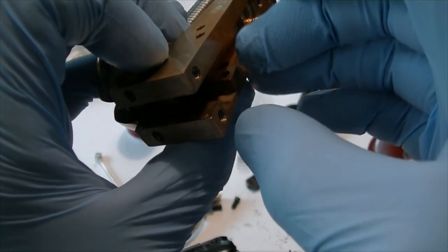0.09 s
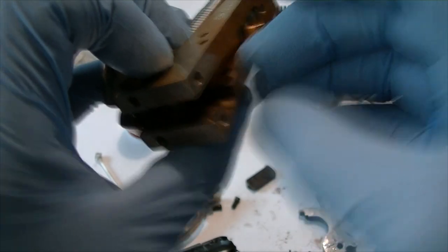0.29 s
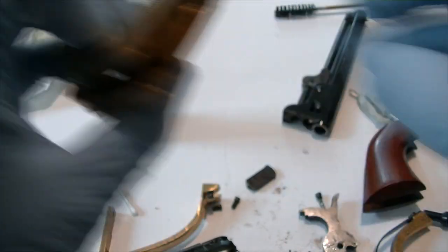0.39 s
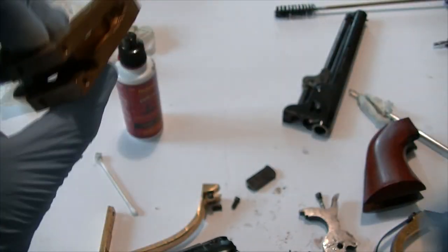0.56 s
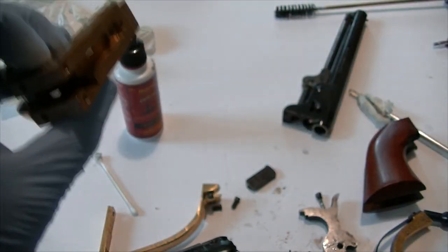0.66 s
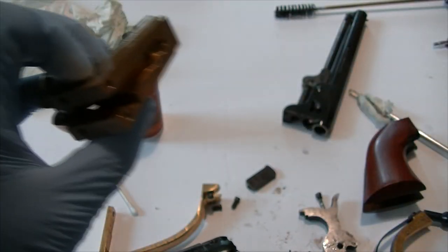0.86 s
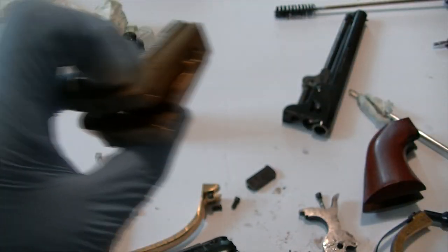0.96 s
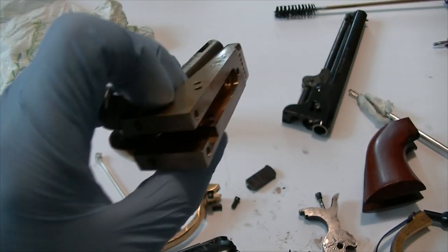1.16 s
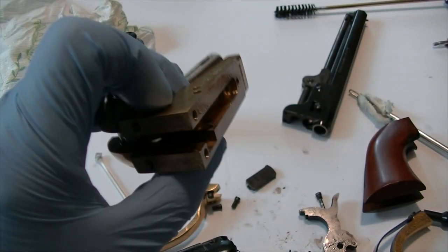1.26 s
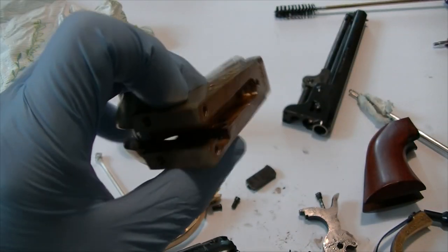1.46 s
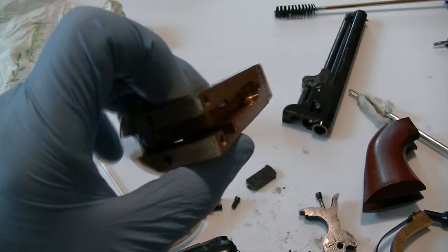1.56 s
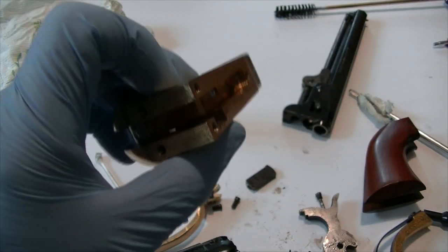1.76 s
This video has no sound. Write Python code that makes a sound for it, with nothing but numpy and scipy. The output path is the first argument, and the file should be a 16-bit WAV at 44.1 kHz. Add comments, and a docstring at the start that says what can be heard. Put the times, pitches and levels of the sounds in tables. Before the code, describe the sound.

A hand tool knocks on a table, bounces and skids to rest after a faint metal ping; then a soft hand bump, rubber glove strokes on metal and light ticks, close up in a small humming room.

```python
"""A motor hums in a small room while gloved hands work on a brass gun frame, close to the microphone.
First a steel part pings (decaying sines) and the rubber squeaks thinly (narrow noise). A hand tool then
knocks, bounces and skids to rest on the table (coloured bursts, table modes, tiny slips), and a hand bumps it.
Last the glove strokes the frame (dense random slips) and squeaks again. Loose parts tick throughout."""
import sys
import numpy as np
from scipy import signal
from scipy.fft import rfft, irfft
from scipy.io import wavfile
from scipy.ndimage import uniform_filter1d

SR = 44100
rng = np.random.default_rng(int(sys.argv[2]) if len(sys.argv) > 2 else 0)


def to_wav(sig):
    """Store sig (one row per channel, or 1-D mono) as 16-bit WAV at the path in sys.argv[1].

    Samples outside -1..1 are clipped; the rate is SR.
    """
    pcm = np.clip(np.atleast_2d(sig), -1, 1) * 32767
    pcm = np.round(pcm).astype(np.int16)
    wavfile.write(sys.argv[1], SR, pcm.T)  # frames by channels


N = 79380
T = np.arange(N) / SR
FREQ_HZ = np.arange(N + 1) * SR / (2 * N)
MID_SIDE_SIGNS = np.array([[1], [-1]])


def undb(db):
    """Decibels to gain."""
    return 10 ** (np.asarray(db) / 20)


def curve(points, size=N):
    """Join (Hz, value) points on a log-frequency axis."""
    hz, value = np.array(points, float).T
    grid_hz = np.linspace(1, SR / 2, size + 1)
    return np.interp(np.log(grid_hz), np.log(hz), value)


def shape(x, response):
    """Apply a frequency response, zero-padded to twice the length."""
    size = x.shape[-1]
    return irfft(rfft(x, 2 * size) * response)[..., :size]


def colour(x, db):
    """Minimum-phase filter with the given gain: the cepstrum is folded to positive time."""
    size = x.shape[-1]
    cepstrum = irfft(db * np.log(10) / 20)
    cepstrum[..., 1:size] *= 2
    cepstrum[..., size + 1:] = 0
    return shape(x, np.exp(rfft(cepstrum)))


def even(x, size):
    """Level the spectrum of a burst, smoothed over size bins; its spread in time stays."""
    power = np.abs(rfft(x, 2 * x.shape[-1])) ** 2
    return colour(x, -10 * np.log10(uniform_filter1d(power, size, axis=-1)))


def unit(x):
    """Scale to rms 1."""
    return x / np.sqrt(np.mean(x ** 2))


def fade(t60_s):
    """Exponential decay from time zero, 60 dB in t60_s."""
    return np.exp(-np.log(1000) * np.minimum(T / t60_s, 10))


def delay(x, start_s):
    """Start a sound at the given time."""
    return np.pad(x, ((0, 0), (max(int(start_s * SR), 0), N)))[:, :N]


def ring(modes):
    """Decaying sines of a struck object."""
    return sum(undb(level_db) * fade(t60_s) * np.sin(2 * np.pi * pitch_hz * T)
               for pitch_hz, level_db, t60_s in modes)


def stereo_noise(side_db, size=N):
    """White noise in two channels with the given side-to-mid level."""
    mid, side = rng.standard_normal((2, size))
    gain = undb(curve(side_db, size))
    norm = np.sqrt(1 + gain ** 2)
    return shape(mid, 1 / norm) + MID_SIDE_SIGNS * shape(side, gain / norm)


# steady motor hum: pitch_hz, level_db (rms)
HUM_TONES = [(118.4, -66.5), (215.3, -58), (344.5, -56), (382.2, -65), (436.0, -61)]
# air noise spectrum: freq_hz, density_db (relative, per Hz)
AIR_SPECTRUM = [(25, -31), (55, -13.5), (326, -2), (394, -7.5), (775, -16), (1040, -18.5), (2110, -21),
                (3250, -23), (16000, -37)]
# air noise width: freq_hz, side_to_mid_db
AIR_SIDE = [(40, -7), (120, -2), (300, -12), (700, 0.5), (1500, 0), (8000, -3)]
AIR_RMS_DB = -50.5


def background():
    """A motor hums as steady sines of random phase over soft, spectrally shaped air noise."""
    hum = sum(np.sqrt(2) * undb(rms_db) * np.sin(2 * np.pi * (pitch_hz * T + rng.random()))
              for pitch_hz, rms_db in HUM_TONES)
    air = shape(stereo_noise(AIR_SIDE), undb(curve(AIR_SPECTRUM)))
    return hum + undb(AIR_RMS_DB) * unit(air)


# width of near sounds and of the echo: freq_hz, side_to_mid_db
NEAR_SIDE = [(500, -16), (1800, -16), (3400, -15), (7000, -0.5), (14000, 1.5)]
# reverberation: freq_hz, t60_s
ROOM_DECAY = [(200, .5), (900, 0.67), (3000, 0.53), (8000, 0.41), (16000, 0.5)]
# echo strength: freq_hz, gain_db
ROOM_GAIN = [(100, -8), (300, -2), (900, -11.5), (2000, -13), (3400, -11), (5000, -10.5), (8000, -7.5),
             (16000, -10.5)]
ROOM_BUILD_S = 0.0054


def room(x):
    """Diffuse echo of a small room: noise bands, each with its own decay, convolved with the mono sum."""
    noise, tail = stereo_noise(NEAR_SIDE), 0
    centres_hz, t60s_s = np.array(ROOM_DECAY).T
    for t60_s, share in zip(t60s_s, np.eye(len(t60s_s))):
        band = curve(list(zip(centres_hz, share)))
        tail = tail + shape(noise, band) * fade(t60_s)
    build = 1 - np.exp(-(T / ROOM_BUILD_S) ** 2)
    tail = colour(even(tail * build, size=300), curve(ROOM_GAIN))
    return shape(x.mean(axis=0), rfft(tail, 2 * N))


# thud modes: pitch_hz, level_before_onset_db, t60_s
THUD_MODES = [(165, -31.5, 0.064)]
BUMP_START_S, BUMP_ONSET_T60_S = .7195, 0.04


def bump():
    """The side of the hand thuds on the table: a low, damped mode with a soft onset."""
    thud = ring(THUD_MODES) * (1 - fade(BUMP_ONSET_T60_S))
    return delay(thud[None], BUMP_START_S)


# free steel part: pitch_hz, level_before_onset_db, t60_s
STEEL_MODES = [(3090, -52, 0.099), (4367, -40, 0.11), (7030, -50, .04), (9640, -40.5, .025),
               (10600, -45, .025)]
PING_START_S, PING_ONSET_T60_S = .015, 0.0016


def ping():
    """A small free steel part rings in a few high modes."""
    steel = ring(STEEL_MODES) * (1 - fade(PING_ONSET_T60_S))
    return delay(steel[None], PING_START_S)


HIT_SAMPLES, SCATTER_FROM_HZ = 4096, 770


def contact(scatter, t60_s):
    """A sharp push plus dense, damped upper-range ringing; scatter is their amplitude ratio before levelling."""
    burst = stereo_noise(NEAR_SIDE, HIT_SAMPLES) * fade(t60_s)[:HIT_SAMPLES]
    highpass = signal.butter(2, SCATTER_FROM_HZ, "high", fs=SR, output="sos")
    burst = signal.sosfilt(highpass, burst)
    burst *= scatter / np.sqrt(np.sum(burst ** 2) / 2)
    burst[:, 0] += 1  # the push
    return even(burst, size=60)


# light touches of loose parts: start_s, level_db (before the tick spectrum)
TICK_EVENTS = [(0.158, -22), (.851, -21.5), (1.109, -19.5), (1.1897, -4), (1.578, -14), (1.6259, -17.5),
               (1.7275, -6.5)]
# tick spectrum: freq_hz, gain_db
TICK_SPECTRUM = [(100, -9), (500, -16), (1000, -2.5), (3500, 2), (6000, -7.5), (10000, -8), (16000, -28)]
TICK_SCATTER, TICK_T60_S = 1.35, 0.016


def ticks():
    """Loose parts touch inside the held frame as short coloured contacts."""
    taps = sum(undb(level_db) * delay(contact(TICK_SCATTER, TICK_T60_S), start_s)
               for start_s, level_db in TICK_EVENTS)
    return colour(taps, curve(TICK_SPECTRUM))


FLUTTER_PER_S, FLUTTER_STD_DB = 160, 2


def friction(strokes, spectrum, slips_per_s):
    """Tiny slips of random size; pressure rises and decays per stroke while the grip flutters."""
    slips = (rng.random(N) < slips_per_s / SR) * rng.standard_normal((2, N))
    side = shape(slips[1], undb(curve(NEAR_SIDE)))
    rub = unit(colour(slips[0] + MID_SIDE_SIGNS * side, curve(spectrum)))
    pressure = 0
    for start_s, length_s, attack_s, release_s, level_db in strokes:
        rise = np.clip((T - start_s) / attack_s, 0, 1)
        release = np.exp(-np.maximum(T - start_s - length_s, 0) / release_s)
        pressure = pressure + undb(level_db) * rise * release
    flutter = np.interp(T * FLUTTER_PER_S, np.arange(N), rng.standard_normal(N))
    return rub * pressure * undb(FLUTTER_STD_DB * flutter)


# tool scrapes: start_s, length_s, attack_s, release_s (time constant), level_db (full pressure, no flutter)
SKID_STROKES = [(.565, 0.091, 0.0079, 0.027, -41), (.77, 0.1, 0.011, 0.2, -57)]
# scrape spectrum: freq_hz, relative_db
SKID_SPECTRUM = [(100, -9), (230, 9), (550, 3.5), (850, 7), (1600, -2.5), (3400, -7), (6000, -8),
                 (16000, -32)]
SKID_SLIPS_PER_S = 1700


def skids():
    """The tool scrapes along the table as it settles, in sparse slips."""
    return friction(SKID_STROKES, SKID_SPECTRUM, SKID_SLIPS_PER_S)


# table top per unit blow: pitch_hz, level_db, t60_s
TABLE_RING = [(229.7, -68, 0.8), (254.4, -44, 0.22), (389.2, -62, 0.93), (447, -53.5, 0.57),
              (664, -50, 0.14), (824.6, -49, 0.15), (1011, -54.5, 0.083)]


def table_top(blows):
    """The table top rings on after each blow, in its own modes."""
    return shape(blows, rfft(ring(TABLE_RING), 2 * N))


# tool on table: start_s, resonance_hz, bass_db, low_mid_db, high_mid_db, treble_db
KNOCK_EVENTS = [(0.2232, 1910, 20, 21, 17.5, 16), (0.2354, 2170, 13, 12.5, 5.5, 10.5),
                (0.4071, 4070, 15.5, 8.5, 13.5, 4.5), (0.4187, 940, 8, 17.5, 14, 10),
                (0.4755, 1260, 2.5, -0.5, -8, -9), (0.5286, 3340, 2, 2.5, -4, 3),
                (.5550, 2260, -0.5, -2.5, 14, 14.5), (0.562, 8060, -2, 2, -4.5, 5.5),
                (0.567, 1330, -3, 1, 0, 1), (0.6106, 1970, -11, -2.5, -13, 5),
                (0.6377, 1940, -9, -7, -9, -19), (1.732, 980, -11.5, -5.5, -41, -3)]
# centres of those four bands: freq_hz
BAND_CENTRES = (250, 900, 2600, 8000)
# spectrum shared by all knocks: freq_hz, gain_db
KNOCK_SPECTRUM = [(50, -25), (110, -18.5), (190, -1.5), (400, 1), (530, -6), (700, 3), (1250, -2.5),
                  (2000, -1.5), (2750, -3.5), (3400, 2.5), (3950, -2), (4500, -4), (5600, -12),
                  (8000, -14.5), (12000, -26), (16000, -39)]
KNOCK_SCATTER, KNOCK_T60_S = 1.54, 0.01
RESONANCE_DB, RESONANCE_OCTAVES = 5.5, 0.24


def knocks():
    """The tool hits the table; where and how hard it lands sets each blow's bands and resonance."""
    blows, bins_hz = 0, np.linspace(1, SR / 2, HIT_SAMPLES + 1)
    for start_s, resonance_hz, *bands_db in KNOCK_EVENTS:
        bands = curve(list(zip(BAND_CENTRES, bands_db)), HIT_SAMPLES)
        octaves = np.log2(bins_hz / resonance_hz)
        resonance = RESONANCE_DB / (1 + (octaves / RESONANCE_OCTAVES) ** 2)
        spectrum_db = curve(KNOCK_SPECTRUM, HIT_SAMPLES) + bands + resonance
        blow = colour(contact(KNOCK_SCATTER, KNOCK_T60_S), spectrum_db)
        blows = blows + delay(blow, start_s)
    return blows


# gaps between the tool's resonances: freq_hz
GAP_CENTRES = [2667, 3970, 5730]
GAP_DB, GAP_WIDTH_HZ, CLOSE_LIFT_DB = -10, 100, 1.0


def close_blows(blows):
    """Blows heard directly: dips between the tool's resonances and a slight overall lift."""
    dips = sum(1 / (1 + ((FREQ_HZ - hz) / GAP_WIDTH_HZ) ** 2) for hz in GAP_CENTRES)
    return colour(blows, GAP_DB * dips + CLOSE_LIFT_DB)


# rubber catching: start_s, length_s, pitch_hz, level_db (rms at mid-squeak)
SQUEAK_EVENTS = [(0.031, 0.012, 9300, -47), (1.698, 0.025, 4240, -44.5)]
SQUEAK_WIDTH = .11  # fraction of pitch


def squeaks():
    """The rubber catches and squeaks thinly: noise gathered round one pitch in a half-sine swell."""
    total = 0
    for start_s, length_s, pitch_hz, level_db in SQUEAK_EVENTS:
        swell = np.sin(np.pi * np.clip((T - start_s) / length_s, 0, 1))
        peak = 1 / (1 + ((FREQ_HZ / pitch_hz - 1) / SQUEAK_WIDTH) ** 2)
        total = total + undb(level_db) * swell * unit(shape(stereo_noise(NEAR_SIDE), peak))
    return total


# rubber on metal: start_s, length_s, attack_s, release_s (time constant), level_db (full pressure, no flutter)
GLOVE_STROKES = [(1.12, 0.07, 0.085, 0.044, -45.5), (1.178, 0.081, 0.076, 0.0033, -43.5),
                 (1.292, 0.0061, 0.0024, 0.026, -46.5), (1.31, 0.13, 0.05, 0.16, -54.5),
                 (1.518, 0.077, 0.031, 0.024, -43), (1.692, 0.067, 0.0023, 0.013, -44.5)]
# rubbing spectrum: freq_hz, relative_db
GLOVE_SPECTRUM = [(150, -29), (800, -0.5), (2300, -6), (4200, 2), (6500, -3), (11000, -8), (16000, -20.5)]
GLOVE_SLIPS_PER_S = 12000


def glove():
    """The rubber glove slides over the frame in short strokes of dense slips."""
    return friction(GLOVE_STROKES, GLOVE_SPECTRUM, GLOVE_SLIPS_PER_S)


# right channel of the hits: freq_hz, gain_db
RIGHT_GAIN = [(3500, -0.37), (6000, -1), (9000, 3)]
RIGHT_LEAD_S = .000016


def scene():
    """Hits a little to the right, the glove in the middle, all in the room."""
    blows = knocks()
    small_hits = ticks() + ping() + skids()
    rubber = glove() + squeaks()
    near = small_hits + close_blows(blows)
    lead = np.exp(2j * np.pi * FREQ_HZ * RIGHT_LEAD_S)
    right = shape(near[1], undb(curve(RIGHT_GAIN)) * lead)
    direct = np.array([near[0], right]) + table_top(blows) + bump() + rubber
    return direct + room(blows + small_hits + rubber) + background()


TOP_HZ = 15750


def record(dry):
    """The recorder clips at full scale, then cuts the top."""
    lowpass = signal.ellip(10, .2, 80, TOP_HZ, fs=SR, output="sos")
    return signal.sosfilt(lowpass, np.clip(dry, -1, 1))


dry = scene()
out = record(dry)
to_wav(out)
```